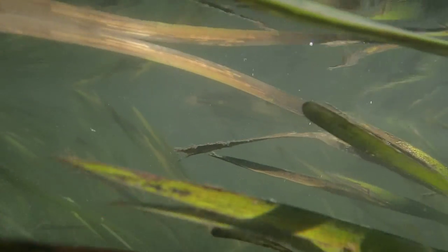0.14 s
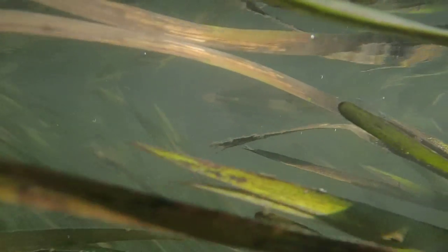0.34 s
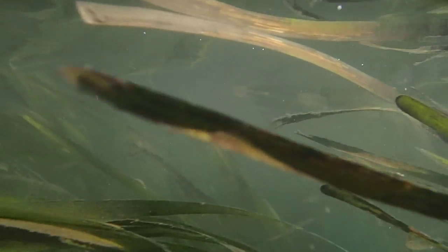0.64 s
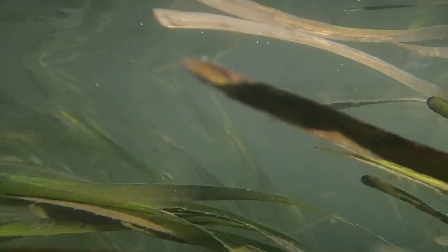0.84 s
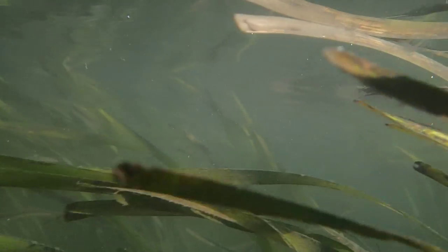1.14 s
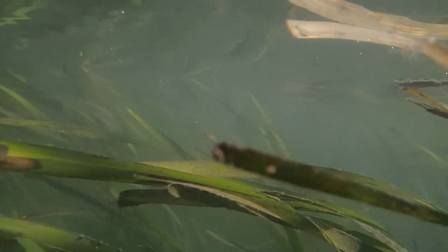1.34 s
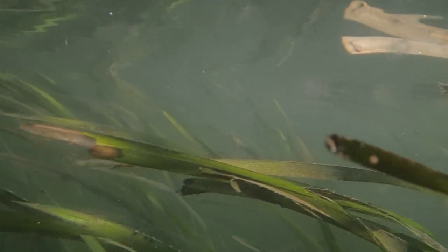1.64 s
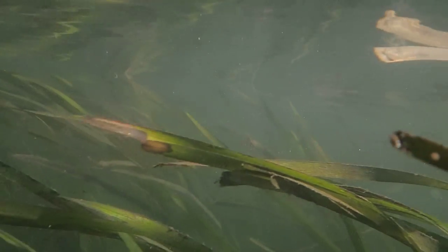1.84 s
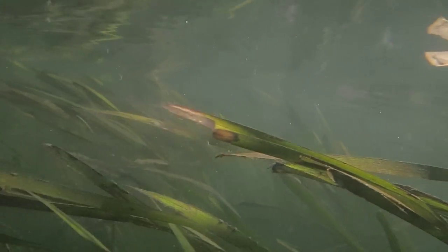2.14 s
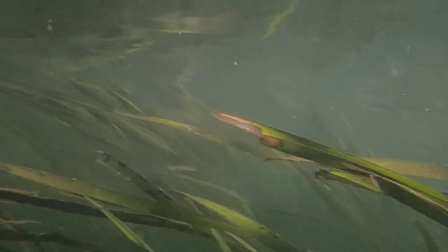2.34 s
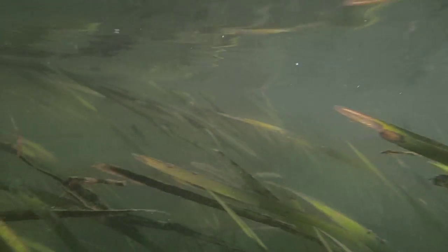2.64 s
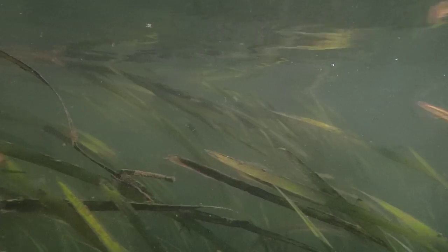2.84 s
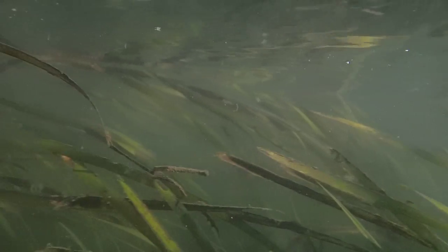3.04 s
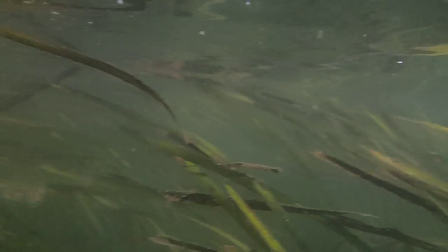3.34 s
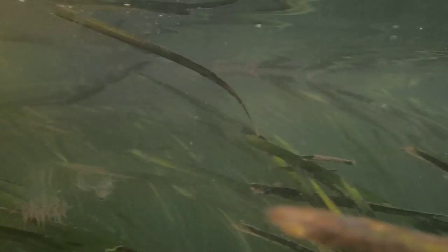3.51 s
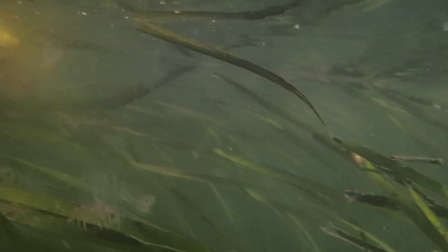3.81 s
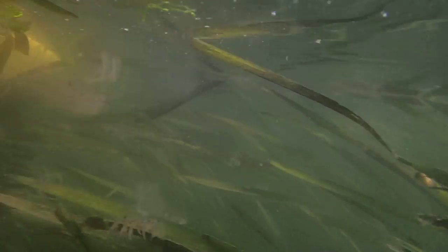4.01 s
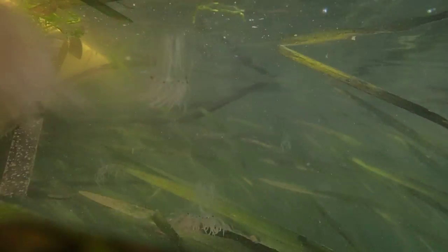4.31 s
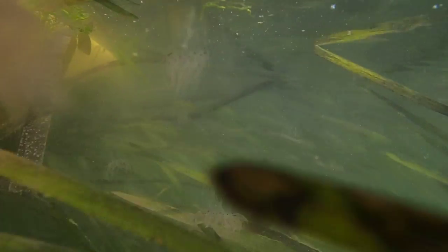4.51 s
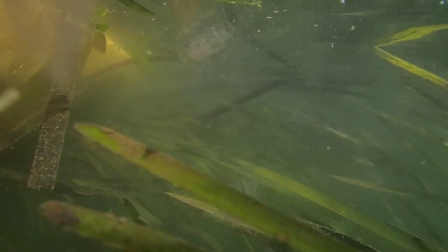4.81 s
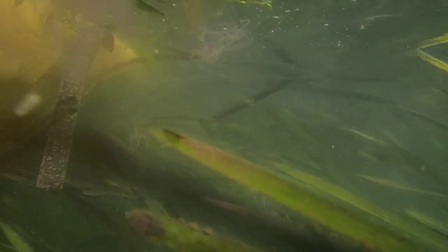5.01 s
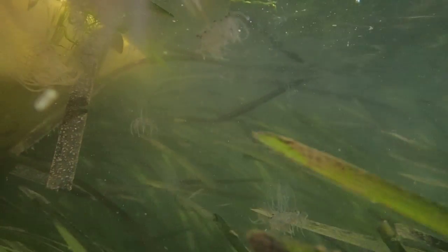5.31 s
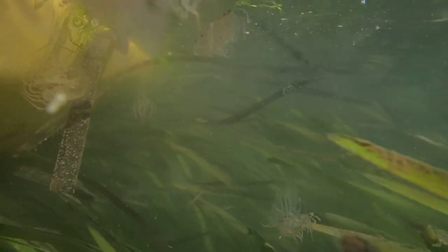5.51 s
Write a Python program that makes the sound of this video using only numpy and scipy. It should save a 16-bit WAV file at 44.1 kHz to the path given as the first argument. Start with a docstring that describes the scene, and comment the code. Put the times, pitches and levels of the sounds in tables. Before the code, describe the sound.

Inside a waterproof camera case drifting through underwater grass: wavering hollow hum, soft nudges, fine patter, a few hollow plops.

```python
"""Water flows past a small camera in a waterproof case: it hums in the hollow case and churns in surges.
The hum is coloured noise plus a drifting resonance; the churn is low noise.
Blades of grass brush and nudge the case, specks patter, and three knocks (shove plus ringing) and light taps hit.
Inside, the camera ticks and whines once a frame over faint tones, a fading drone and microphone hiss.
A limiter ducks the loud peaks of the knocks and then lets the level creep back."""
import sys
import numpy as np
from scipy import signal
from scipy.fft import rfft, irfft
from scipy.io import wavfile
from scipy.ndimage import uniform_filter1d

SR = 44100
rng = np.random.default_rng(int(sys.argv[2]) if len(sys.argv) > 2 else 0)


def log_audio(samples):
    """Write samples as a 16-bit WAV file to the path given in sys.argv[1]."""
    # one column per channel
    frames = np.atleast_2d(samples).T
    # limit to full scale, then quantise
    limited = np.clip(frames, -1, 1)
    pcm = np.round(limited * 32767).astype(np.int16)
    wavfile.write(sys.argv[1], SR, pcm)


N = 249606
TIME = np.arange(N) / SR  # seconds

# All colours of noises and clicks are relative: the sound is scaled afterwards.
# All left-right values say how much stronger the left is than the right.

# The microphone's own noise. Each row: pitch in Hz, strength in dB per Hz.
HISS_COLOUR = [(15, -5), (100, 10.5), (1400, 4.5), (2300, 1), (3200, -1), (3800, -3.5), (4400, -2.5),
               (5000, -4), (7200, -2), (8500, -6), (15500, -7.5)]

# A low drone: pitch in Hz, level at the start in dB, fade in dB per second.
DRONE_HZ, DRONE_DB, DRONE_FADE_DB_PER_S = 120, -49.5, 2.5
# Tones waver by this share of their pitch (rms), at up to this rate in Hz.
WAVER, WAVER_HZ = 0.0053, 9

FRAME_HZ = 29.97  # camera frames per second
# The whine: level at the start in dB, slow fall in dB per second.
WHINE_DB, WHINE_FALL_DB_PER_S = -55, 0.5
# Spells in which the whine skips every other frame. Each row: start in seconds, end in seconds.
WHINE_STUTTERS = [(.03, .13), (.3, .4), (1.17, 1.33), (2.4, 2.57), (3.37, 3.77), (5.2, 5.5)]
SKIP_CHANCE = .015  # chance (0-1) that the whine skips a frame outside those spells

# How hard the camera's mechanism works. Each row: time in seconds, level in dB.
MECHANISM_LEVEL = [(0, -54.5), (1.2, -46.5), (2.6, -51), (5.6, -45.5)]
# Faint tones of the camera. Each row: pitch in Hz, dB above the mechanism's level at the start,
# growth against that level in dB per second.
CAMERA_TONES = [(326.7, 5, -0.46), (578, -3.5, 2.5), (594.5, 5.5, 0), (621, -1.5, 1), (702.4, -11.5, 2.2),
                (1041, -6.5, -0.23), (1288, -26, 1.44)]
# The colour of each frame tick. Each row: pitch in Hz, strength in dB.
TICK_COLOUR = [(60, -35), (300, -7), (520, -4), (600, 4), (700, 1), (800, -2), (900, -3), (1060, 0),
               (1110, -5), (1160, -18), (1300, -19), (1500, -33), (2500, -42), (8000, -50)]

# Specks and small bubbles, thicker where the grass closes in. Each row: time in seconds, specks per second.
SPECK_RATE = [(0, 13), (3.1, 14), (3.6, 80), (5.6, 114)]
# The colour of a speck. Each row: pitch in Hz, strength in dB.
SPECK_COLOUR = [(40, -49.5), (200, -10.5), (400, -3.5), (620, 1.5), (740, 0.5), (880, -9.5), (1100, -9.5),
                (1180, -16.5), (1320, -18), (1600, -31.5), (3000, -45), (9000, -57)]
# Peak of the smallest speck in dB, and the typical spread of sizes above it in dB.
SPECK_DB, SPECK_SPREAD_DB = -34.5, 4

# Knocks on the case. Each row: start in seconds, level in dB, brightness in dB per octave,
# pitch as a share of the case's own pitches.
KNOCKS_ON_CASE = [(2.4409, -5, -1.94, 0.99), (2.8083, -14.5, -2.5, 0.947), (2.8565, -8.5, -1.5, 0.943)]
# What the case rings with when knocked. Each row: pitch in Hz, relative level in dB, left-right in dB.
CASE_MODES = [(191, -8.5, 8), (475, -2, -15), (853, -2, -18), (1184, -11, -8), (1930, -33, 18),
              (2940, -17.5, -7), (4350, -25, -18), (6900, -25, -6), (11500, -37, -2)]
# The sideways shove of a knock: time scale in seconds, delay of its middle in seconds,
# gain in dB, reversed share felt at the right port (0-1).
SHOVE_S, SHOVE_DELAY_S, SHOVE_DB, SHOVE_FAR = 0.00055, 0.00096, 2, .3
# Light taps on the case. Each row: start in seconds, peak in dB, brightness in dB per octave.
LIGHT_TAPS = [(1.023, -27, -15.5), (3.116, -32, -14.5), (4.173, -32, -10), (4.669, -28, -4.5),
              (5.067, -36, -9), (5.407, -32, -8.5)]
# The colour of a light tap before its brightness is set. Each row: pitch in Hz, strength in dB.
TAP_COLOUR = [(20, -85), (100, -37), (500, -2), (900, 12), (1500, 13), (2200, -2), (4000, -1), (5800, 3),
              (6900, 16), (9000, -21), (15000, -37)]

# Grass nudging the case. Each row: middle in seconds, length in seconds, level in dB, left-right in dB.
GRASS_NUDGES = [(0.552, 0.029, -43.5, 12), (0.67, 0.041, -43, 7), (0.733, 0.052, -41, 15),
                (0.784, 0.041, -33, -28), (1.017, 0.079, -47, 0), (1.984, 0.1, -53, -7),
                (2.106, 0.066, -45, -18), (2.36, 0.059, -52, -14), (2.72, 0.092, -52, 10),
                (2.944, 0.031, -39, -21), (3.434, 0.08, -45, 9), (3.6, 0.074, -49, 17)]
# The low puff of a nudge. Each row: pitch in Hz, strength in dB per Hz.
PUFF_COLOUR = [(12, -9), (35, -15), (75, 9), (120, 5.5), (250, -25), (700, -70)]
# Blades sliding along the case. Each row: middle in seconds, length in seconds, level in dB.
BLADE_SCRAPES = [(0.73, 0.05, -53.5), (0.798, .03, -58), (4.23, 0.23, -62)]
# The rustle of the scrapes. Each row: pitch in Hz, strength in dB per Hz.
RUSTLE_COLOUR = [(100, -29), (600, -17), (1300, 1), (1900, 2), (2700, -6), (3800, -11), (6000, -12),
                 (12000, -32)]

# Strength of the steady flow round the case. Each row: time in seconds, relative level in dB.
FLOW_LEVEL = [(0, -31), (.28, -29), (.55, -29.5), (1.15, -29), (1.72, -31.5), (1.88, -28.5), (2.25, -30.5),
              (2.45, -29), (3.1, -30), (4.4, -28), (5.6, -30)]
# Surges of churning water. Each row: middle in seconds, length in seconds, relative level in dB.
WATER_SURGES = [(0.744, 0.091, -37.5), (0.98, 0.084, -67), (2.805, 0.3, -41.5), (3.21, .15, -39),
                (3.557, 0.29, -31.5), (4.163, 0.4, -34.5), (4.744, 0.13, -36), (4.893, .14, -37.5)]
# How the case colours the flow. Each row: pitch in Hz, strength in dB per Hz.
HUM_COLOUR = [(20, -55), (150, -15.5), (270, -10.5), (330, -8), (410, -1), (490, -3.5), (550, -4.5),
              (592, -5), (655, -12), (770, -19.5), (900, -26.5), (1060, -27.5), (1150, -34.5), (1600, -57)]
# Where the hum's core lies before it wanders. Each row: time in seconds, pitch in Hz.
CORE_PITCH = [(0, 480.6), (1.4, 444), (1.88, 482), (2.1, 447), (2.4, 497), (4.2, 440.3), (5.6, 451)]
# The core wanders by this share of its pitch (rms), at up to this rate in Hz.
CORE_WANDER, CORE_WANDER_HZ = 0.033, 6
# Eddies at the case. Each row: pitch in Hz, strength in dB per Hz.
CHURN_COLOUR = [(18, -68), (40, -37), (70, -15.5), (120, -2.5), (180, 2.5), (250, -2.5), (350, -24),
                (700, -59), (2000, -91)]
# Gain from the flow to its steady eddies, and from a surge to the hum, in dB.
EDDIES_DB, SURGE_HUM_DB = -20.5, -5
# Chance swells of the hum and of the eddies in dB (rms), and their fastest rate in Hz.
HUM_SWELL_DB, EDDY_SWELL_DB, SWELL_HZ = .5, 1.5, 5

# The case's resonances shift the two ports against each other.
# Each row: pitch in Hz, lead of the left port in radians.
PORT_LEAD = [(280, -0.04), (450, 0.2), (530, -0.42), (740, -1.55), (910, -0.16), (1200, 0.83),
             (1330, 0.045), (1480, -1.7), (1900, 0.4), (3000, -0.45)]
# A narrow dip in the microphone's response: centre in Hz, depth (0-1).
NOTCH_HZ, NOTCH_DEPTH = 4060, .88
EDGE_HZ = 15800  # top of the band


def amp(db):
    """Turns decibels into a gain."""
    return 10 ** (np.asarray(db) / 20)


def evened(x):
    """Scales a sound to an rms of 1."""
    return x / np.sqrt(np.mean(x ** 2) + 1e-20)


def smooth(x, seconds):
    """Takes a running mean along time."""
    return uniform_filter1d(x, size=int(seconds * SR) + 1)


def sides(balance_db):
    """Left and right gains, averaging 1, for a left-right level difference."""
    gains = amp([[balance_db / 2], [-balance_db / 2]])
    return gains / gains.mean()


def add(mix, s, sound):
    """Mixes a stereo sound in at time s."""
    part = mix[:, max(round(s * SR), 0):][:, :sound.shape[1]]
    part += sound[:, :part.shape[1]]


def swell(middle, length):
    """A soft rise and fall of height 1."""
    return np.exp(-(2 * (TIME - middle) / length) ** 2)


def wander(rate_hz):
    """A slow random curve of rms 1: sines at random phases, none faster than the given rate."""
    rates = np.geomspace(rate_hz / 8, rate_hz, num=16)
    t = TIME[::100]  # slow enough to compute coarsely
    phases = rng.random((len(rates), 1))
    waves = np.sin(2 * np.pi * (rates[:, None] * t + phases))
    return np.interp(TIME, t, evened(waves.sum(0)))


def tone(hz):
    """A sine that wavers slightly in pitch."""
    wavering_hz = hz * (1 + WAVER * wander(WAVER_HZ))
    return np.sin(2 * np.pi * np.cumsum(wavering_hz) / SR)


def noise(spectrum, likeness):
    """Coloured noise at the two microphone ports; likeness is the share they have in common (0-1)."""
    hz, db = np.transpose(spectrum)
    bins = np.log(np.fft.rfftfreq(N, 1 / SR) + 1)
    colour = amp(np.interp(bins, np.log(hz), db))
    white = rng.standard_normal((3, N))
    both = np.sqrt(likeness) * white[0] + np.sqrt(1 - likeness) * white[1:]
    return evened(irfft(rfft(both) * colour, N))


def click(spectrum, tilt_db=0):
    """A sharp click of peak 1 with the given colour, its energy packed as early as possible."""
    hz, db = np.transpose(spectrum)
    bins = np.log(abs(np.fft.fftfreq(2048, 1 / SR)) + 1)
    tilted_db = db + tilt_db * np.log2(hz)
    log_gain = np.log(amp(np.interp(bins, np.log(hz), tilted_db)))
    minimum_phase = np.exp(np.conj(signal.hilbert(log_gain)))
    wave = np.fft.ifft(minimum_phase).real
    return wave / abs(wave).max()


def resonate(x, hz, width_hz):
    """A steep resonance that follows the curve hz: shift down to zero, low-pass, shift back up."""
    turn = np.exp(2j * np.pi * np.cumsum(hz) / SR)
    r = np.exp(-np.pi * width_hz / SR)
    low = signal.lfilter([(1 - r) ** 2], [1, -2 * r, r * r], x / turn)
    return (turn * low).real


def hiss():
    """The microphone's own noise, unrelated at the two ports."""
    return sides(-3.5) * amp(-53) * noise(HISS_COLOUR, likeness=0)


def drone(flutter_db=2):
    """A faint, unsteady low drone fades as the camera drifts on."""
    level_db = DRONE_DB - DRONE_FADE_DB_PER_S * TIME + flutter_db * wander(WAVER_HZ)
    return sides(0.8) * amp(level_db) * tone(DRONE_HZ)


def whine(hz=7523, lead_s=0.0068, duty=0.7):
    """Electronics by the right port sing for part of each frame, at a fresh phase; some frames are skipped."""
    clock = (TIME + lead_s) * FRAME_HZ
    frame = np.floor(clock).astype(int)
    sings = rng.random(frame.max() + 1) > SKIP_CHANCE
    for first, last in np.round(np.array(WHINE_STUTTERS) * FRAME_HZ).astype(int):
        sings[first:last:2] = False
    is_on = (clock % 1 < duty) & sings[frame]
    gate = smooth(1. * is_on, seconds=.0015)
    # phase in cycles: the left port lags
    start = rng.random(len(sings))[frame] + np.array([[-.38], [0]])
    level = sides(-17) * amp(WHINE_DB - WHINE_FALL_DB_PER_S * TIME)
    return level * gate * np.sin(2 * np.pi * (hz * TIME + start))


def mechanism(tick_db=20):
    """The camera twitches once a frame, every other time a little late, over a few faint tones."""
    level_db = np.interp(TIME, *np.transpose(MECHANISM_LEVEL))
    tones = sum(amp(level_db + db + growth * TIME) * tone(hz) for hz, db, growth in CAMERA_TONES)
    out = sides(-0.74) * tones
    tick = sides(-3.2) * click(TICK_COLOUR)
    for frame, s in enumerate(np.arange(0, TIME[-1], 1 / FRAME_HZ)):
        size, late, slack = rng.standard_normal(3)
        db = level_db[int(s * SR)] + tick_db + .9 * size
        start = s + .0283 + .0003 * (frame % 2) + .00007 * late
        add(out, start, amp(db) * tick)
        # it settles back, softly
        add(out, start + .013 + .001 * slack, amp(db - 13) * tick)
    return out


def patter():
    """Specks and bubbles make dull little ticks at random moments, most of them tiny."""
    hits = rng.random(N) < np.interp(TIME, *np.transpose(SPECK_RATE)) / SR
    size_db = SPECK_DB + SPECK_SPREAD_DB * np.minimum(rng.exponential(1, N), 3)
    ticks = signal.oaconvolve(hits * amp(size_db), click(SPECK_COLOUR))[:N]
    return sides(-2.5) * ticks


def shove():
    """A knock pushes and pulls the case once, strongly at the left port and reversed at the right."""
    u = (np.arange(512) / SR - SHOVE_DELAY_S) / SHOVE_S
    return np.array([[1], [-SHOVE_FAR]]) * amp(SHOVE_DB) * u * np.exp(-u * u)


def ring(tilt_db, pitch):
    """Water-damped modes of the case: each swells and dies within a few cycles, so low ones come last."""
    t, out = np.arange(2048) / SR, 0
    pivot_hz = CASE_MODES[1][0]  # brightness tilts about this mode
    for hz, db, balance_db in CASE_MODES:
        swell_s = min(2.4 / hz, .0055)
        envelope = (t / swell_s * np.exp(1 - t / swell_s)) ** 3
        wave = np.cos(2 * np.pi * hz * pitch * (t - swell_s))
        level = amp(db + tilt_db * np.log2(hz / pivot_hz))
        out = out + sides(balance_db) * level * envelope * wave
    return out


def blows():
    """A knock is a shove together with a ring, a hollow plop; a light tap is only a click."""
    out = np.zeros((2, N))
    for s, db, tilt_db, pitch in KNOCKS_ON_CASE:
        add(out, s, amp(db) * shove())
        add(out, s, amp(db) * ring(tilt_db, pitch))
    for s, db, tilt_db in LIGHT_TAPS:
        add(out, s, sides(-1.3) * amp(db) * click(TAP_COLOUR, tilt_db))
    return out


def grass():
    """Soft blades push on the case with a low puff of noise; a few scrape along it with a rustle."""
    nudges = np.zeros((2, N))
    puff = noise(PUFF_COLOUR, likeness=0)
    for s, length, db, balance_db in GRASS_NUDGES:
        nudges += sides(balance_db) * amp(db) * swell(s, length) * puff
    scrape = sum(amp(db) * swell(s, length) for s, length, db in BLADE_SCRAPES)
    return nudges + scrape * noise(RUSTLE_COLOUR, likeness=1.0)


def hollow_hum(body_db=-.5, core_db=-2.3):
    """Water drives the hollow of the case: broad coloured noise plus a main resonance that drifts."""
    body = noise(HUM_COLOUR, likeness=.74)
    drive = noise(HUM_COLOUR, likeness=.85)
    core_hz = np.interp(TIME, *np.transpose(CORE_PITCH)) * (1 + CORE_WANDER * wander(CORE_WANDER_HZ))
    core = evened(resonate(drive, core_hz, width_hz=48))
    hum = amp(body_db) * body + amp(core_db) * core
    # even out its own slow swells, so that the flow sets them
    return hum / np.sqrt(smooth((hum ** 2).mean(0), seconds=0.31))


def flow(hum_db=1):
    """Passing water makes the hollow case hum while low eddies churn round it; surges feed both."""
    steady = amp(np.interp(TIME, *np.transpose(FLOW_LEVEL)))
    surge = sum(amp(db) * swell(s, length) for s, length, db in WATER_SURGES)
    hum_level = (steady + amp(SURGE_HUM_DB) * surge) * amp(hum_db + HUM_SWELL_DB * wander(SWELL_HZ))
    eddy_level = (amp(EDDIES_DB) * steady + surge) * amp(EDDY_SWELL_DB * wander(SWELL_HZ))
    # the eddies churn almost independently at the two ports; the right one is flipped in sign
    eddies = noise(CHURN_COLOUR, likeness=0.033) * np.array([[1], [-1]])
    return sides(-5.0) * hum_level * hollow_hum() + sides(1.5) * eddy_level * eddies


def ports(x):
    """Turns left against right by the case's phase difference, half on each side."""
    lead = np.interp(np.fft.rfftfreq(N, 1 / SR), *np.transpose(PORT_LEAD))
    return irfft(rfft(x) * np.exp(.5j * np.array([lead, -lead])), N)


def scene():
    """Water, grass and the camera's own sounds, all heard from inside the case."""
    through_case = ports(mechanism() + patter() + flow())
    return hiss() + drone() + whine() + blows() + grass() + through_case


def record(dry, ceiling_db=-8.5):
    """A narrow notch; a limiter that catches loud peaks and creeps back; then the band limit."""
    notched = signal.lfilter(*signal.iirnotch(NOTCH_HZ, 6, fs=SR), dry)
    dry = dry + NOTCH_DEPTH * (notched - dry)
    peak_db = 20 * np.log10(abs(dry).max(0) + 1e-9)
    over_db = np.maximum(peak_db - ceiling_db, 0)
    # hold each peak; the cut in dB dies away with a time constant of 0.085 s
    release = np.exp(TIME / .085)
    held_db = np.maximum.accumulate(over_db * release) / release
    limited = dry * amp(-smooth(held_db, seconds=0.0004))
    low_pass = signal.firwin(511, EDGE_HZ, window=("kaiser", 9), fs=SR)
    return signal.oaconvolve(limited, low_pass[None], "same")


dry = scene()
out = record(dry)
log_audio(out)
```